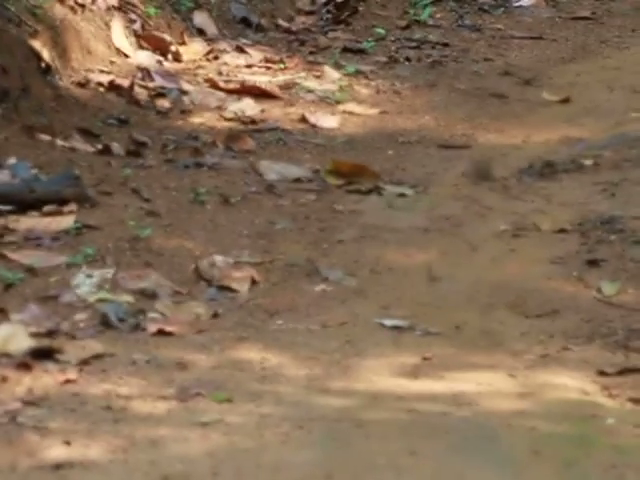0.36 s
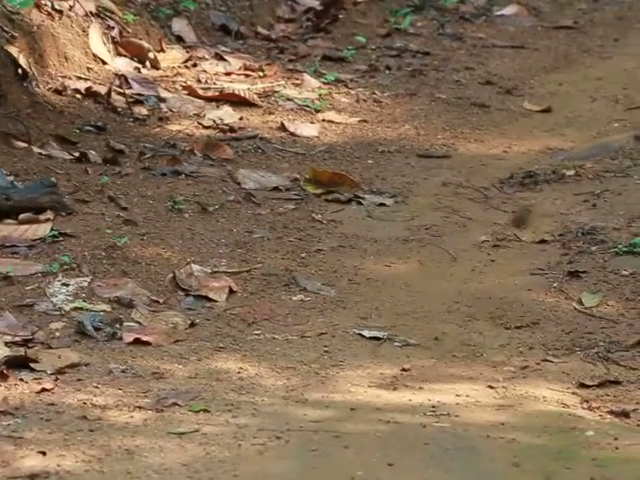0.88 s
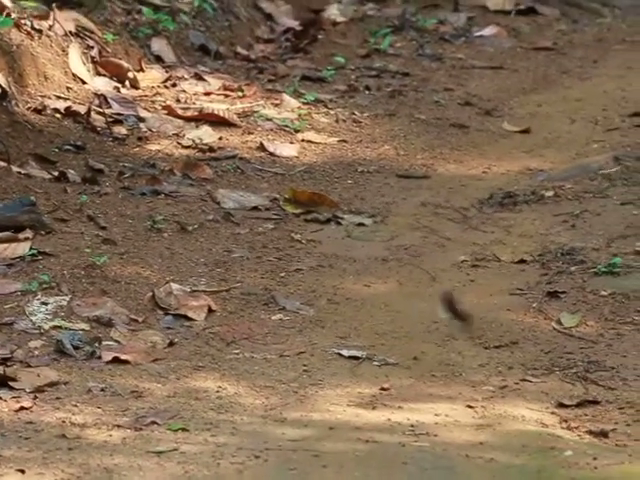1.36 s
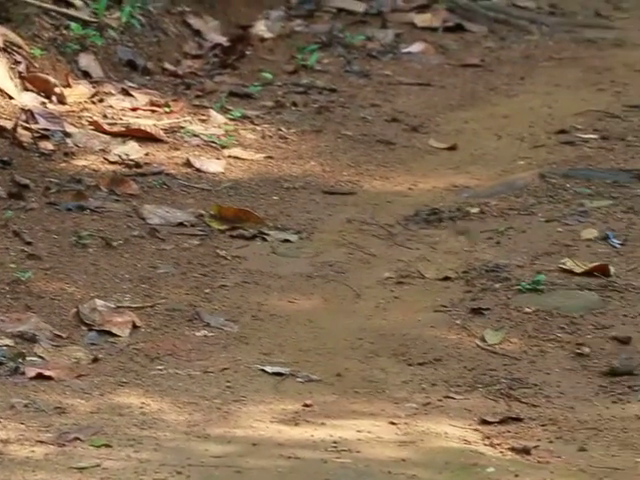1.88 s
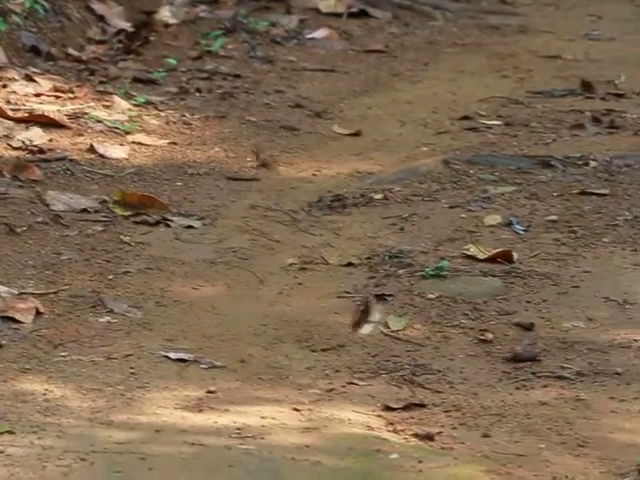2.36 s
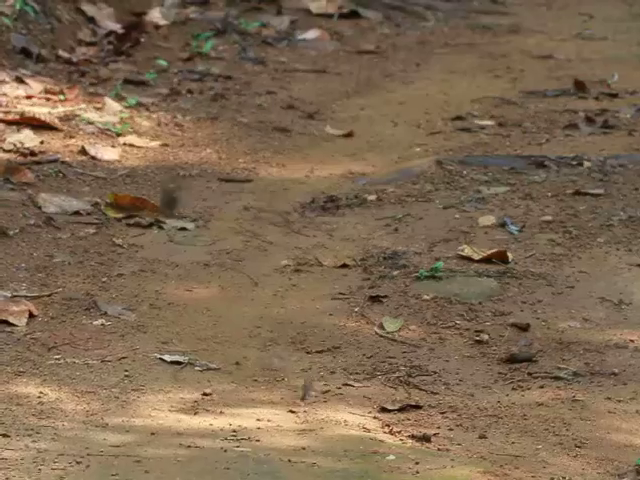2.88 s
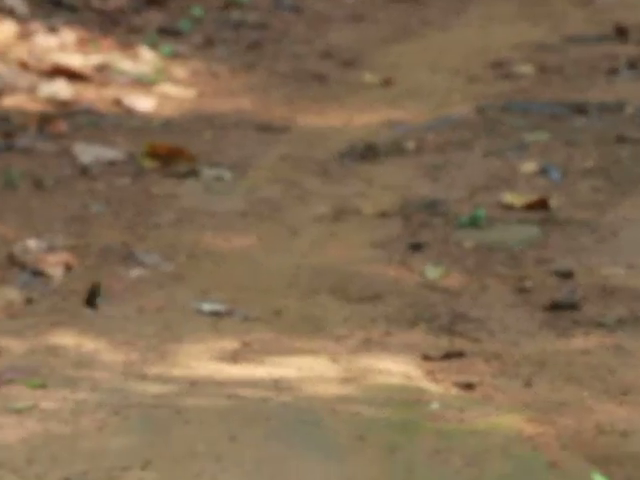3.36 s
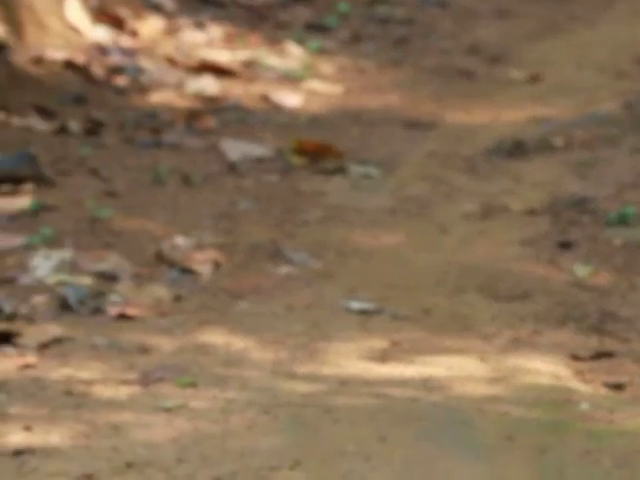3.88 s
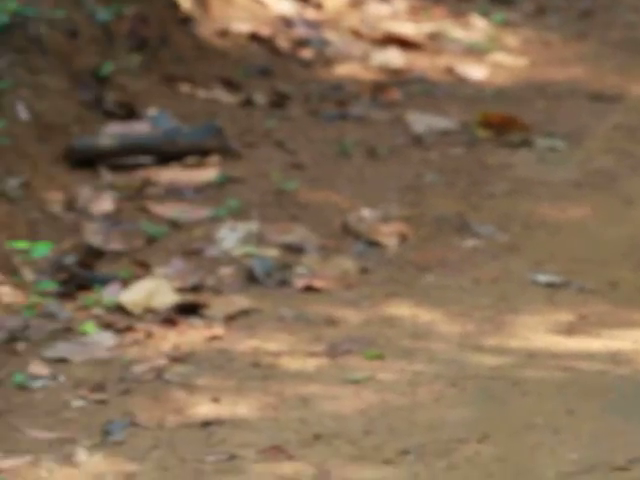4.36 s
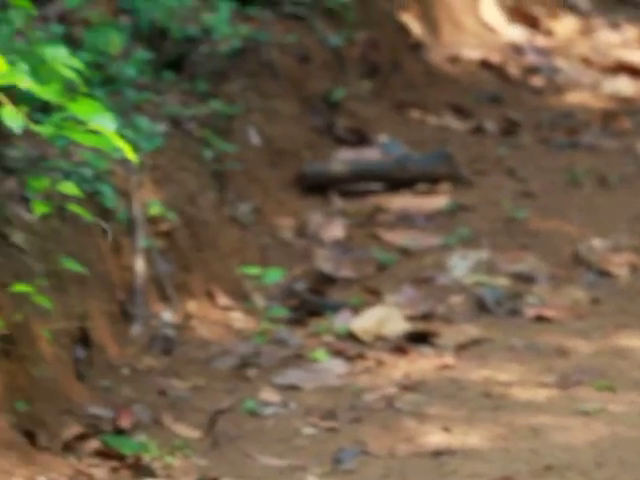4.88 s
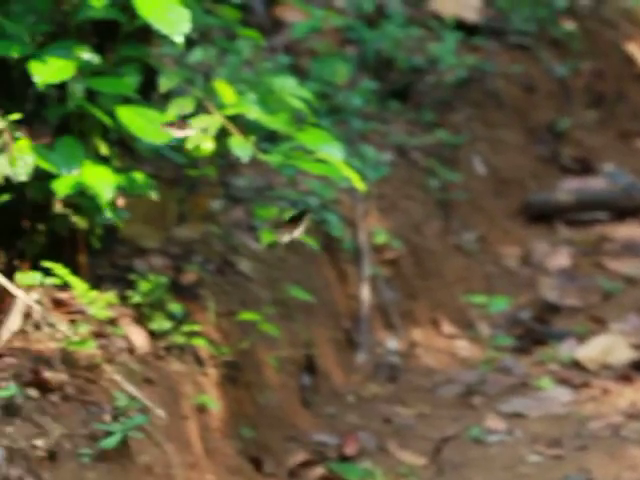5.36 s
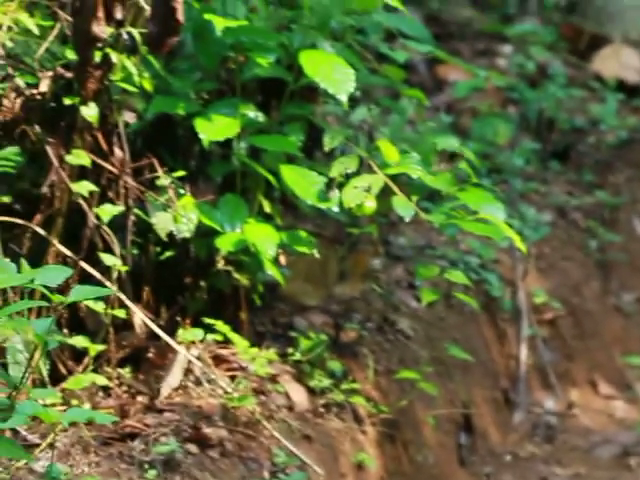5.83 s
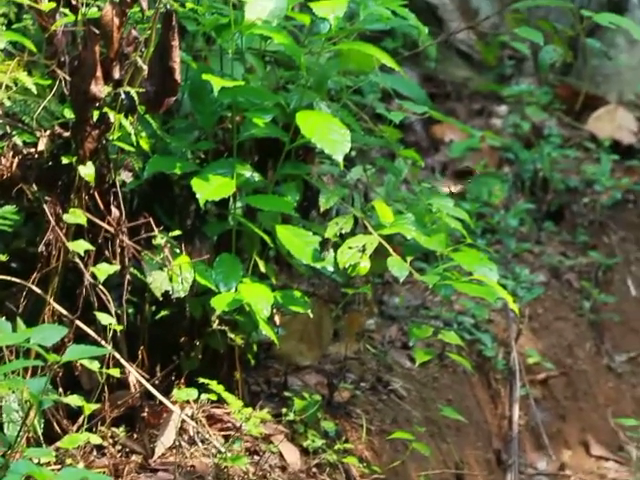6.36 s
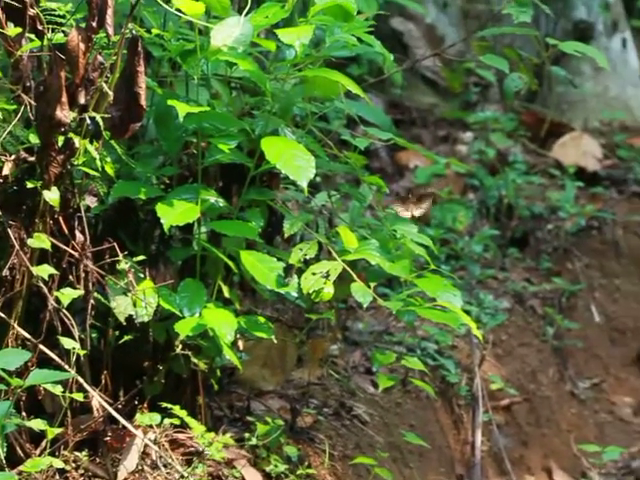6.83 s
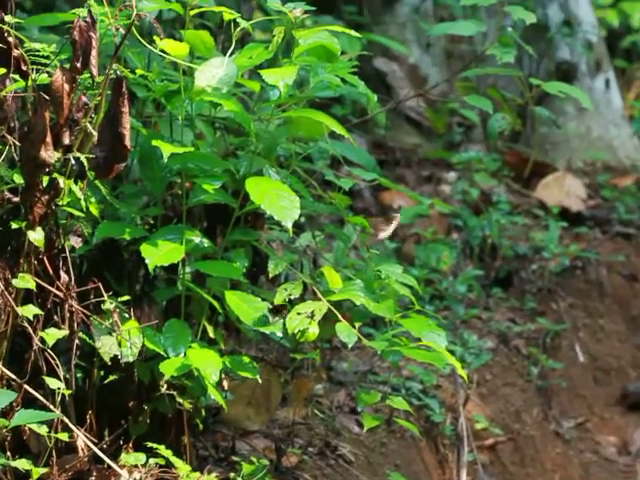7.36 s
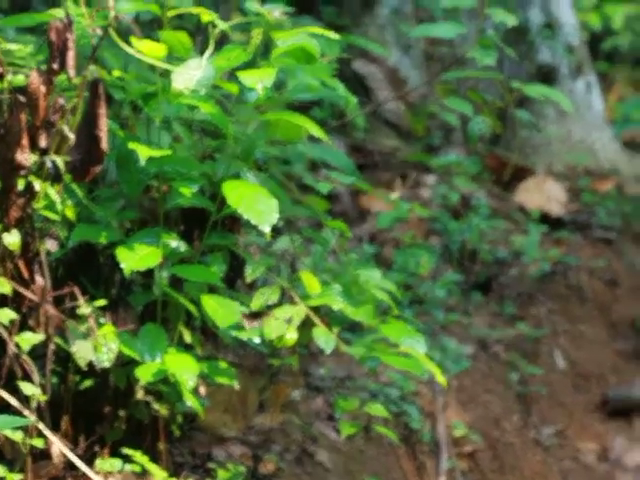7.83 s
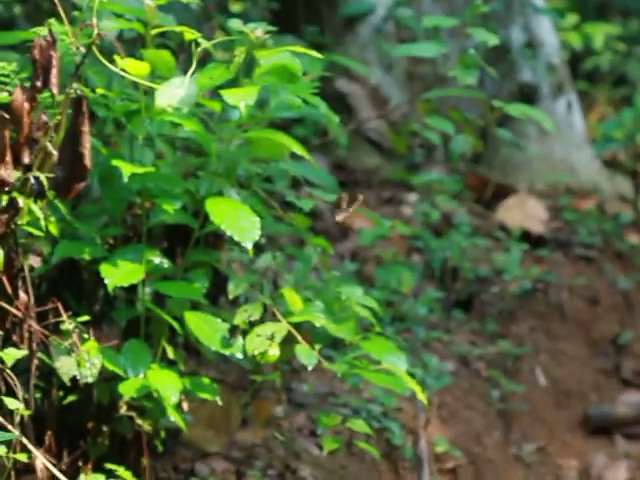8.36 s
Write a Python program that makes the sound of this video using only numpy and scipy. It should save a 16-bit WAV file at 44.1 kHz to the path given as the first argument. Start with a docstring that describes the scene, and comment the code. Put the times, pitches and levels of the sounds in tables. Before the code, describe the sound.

Many cicadas blend into one bright, buzzing high whine that swells slightly and then holds steady. A two-step insect call repeats about twice a second, and a clean, needle-like tone joins in bouts from the middle onward. Handling thumps dot the take, some clustered midway and near the end. Little rising chirps begin after the middle, softly echoed by trees, over a barely audible far engine and low air rumble.

```python
"""A crowd of cicadas drones over a forest path in the heat: many wavering tones that share one harmonic stack.
Two nearer insects sing thin lines in it; hiss and a throbbing buzz from filtered noise stand for far insects.
A small bird starts to chirp in quick upward glides, and far birds pipe faintly as short whistles.
Knocks ring the body of the hand-held recorder, and rustles are puffs of noise.
Underneath, a far engine built from sine waves revs once, over leaf murmur and rumble from shaped noise."""
import sys
import numpy as np
from scipy import signal
from scipy.fft import rfft, irfft
from scipy.io import wavfile

SR = 44100
rng = np.random.default_rng(int(sys.argv[2]) if len(sys.argv) > 2 else 0)


def ratio_of_db(decibels):
    """Turn decibels (scalar or array-like) into linear amplitude factors; 0 dB maps to 1."""
    return 10 ** (np.asarray(decibels, float) / 20)


def digitize_waveform(pressure):
    """Quantize a signal to 16-bit integers and store it at the path in sys.argv[1].

    Rows of a 2-D input are taken as channels; values are limited to [-1, 1].
    """
    field = np.atleast_2d(pressure).T
    bounded = np.clip(field, -1, 1)
    quanta = np.round(bounded * 32767).astype(np.int16)
    wavfile.write(sys.argv[1], SR, quanta)


N = 384552
T = np.arange(N) / SR


def rms_one(x):
    """Scale to an rms level (average strength) of 1."""
    return x / np.sqrt(np.mean(np.abs(x) ** 2) + 1e-20)


def in_time(rows):
    """Join the points of a table by lines and give each column after the time, sample by sample."""
    time_s, *columns = np.transpose(rows)
    return [np.interp(T, time_s, column) for column in columns]


def drift(knots_per_s):
    """Random wander of spread about 1: chance values joined by lines."""
    knots = rng.standard_normal(int(N / SR * 2000))
    return 1.22 * np.interp(T * knots_per_s, np.arange(len(knots)), knots)   # 1.22: the lines narrow the spread


def coloured(spectrum):
    """Noise whose strength at each pitch follows the given spectrum, rms 1."""
    hz, db = np.transpose(spectrum)
    bin_hz = np.arange(N // 2 + 1) * SR / N
    shape_db = np.interp(np.log(bin_hz + 1), np.log(hz), db, left=-90, right=-90)
    return rms_one(irfft(rfft(rng.standard_normal(N)) * ratio_of_db(shape_db), N))


def resonance(x, hz, width_hz):
    """A two-pole resonance: it favours sound near one pitch, with gain 1 on top."""
    r = np.exp(-np.pi * width_hz / SR)
    feed = np.array([1, 0, -1]) * (1 - r * r) / 2
    return signal.lfilter(feed, [1, -2 * r * np.cos(2 * np.pi * hz / SR), r * r], x)


def phasor(hz):
    """A turning unit arrow whose speed follows hz; its real part is a pure tone."""
    turns = np.cumsum(hz) / SR % 1
    return np.exp(2j * np.pi * turns).astype(np.complex64)


def tymbal(strokes_hz, depth):
    """Buckling strokes swell the tone some two hundred times a second, which sets side lines beside it."""
    uneven_hz = strokes_hz * (1 + .02 * drift(6) + rng.normal(0, .01))
    return 1 + depth * phasor(uneven_hz).real


def among_trees(x, echo_db, t60):
    """Scattered echoes from trunks and leaves blur a far sound; they fade by 60 dB in t60 seconds."""
    u = T[:SR // 2]
    tail = rng.standard_normal(len(u)) * ratio_of_db(-60 * u / t60) * (u > .008)
    echoes = signal.fftconvolve(x, tail / np.linalg.norm(tail))[:len(x)]
    return x + ratio_of_db(echo_db) * echoes


CROWD_HZ, BELOW_HZ, ABOVE_HZ = 2554.6, 66.0, 30.0   # commonest pitch, scale of the spread below and above it
WARM_UP_HZ, WARM_UP_S = 18, 1.7   # the crowd begins this flat; in tune by then
TYMBAL_HZ = 220   # strokes a second
# The crowd's other overtones, each favoured by a resonance.
# Columns: partial (multiple of the pitch), level_db (against the shrill fourth), width_hz (of the resonance)
PARTIALS = [(2, -22.0, 620), (3, -30.5, 900), (5, -22.5, 630), (6, -32.5, 900)]


def crowd(low_db, shrill_db, count=26):
    """Each cicada has its own pitch, waver and fading; all partials of one animal share its waver."""
    sums = np.zeros((6, N), np.complex64)
    spread = np.linspace(-1, 1, count)
    offsets = np.sign(spread) * -np.log(1 - np.abs(spread) * .93)   # crowded in the middle, thin outside
    flat_hz = WARM_UP_HZ * np.clip(2 - 2 * T / WARM_UP_S, 0, 1)
    together_hz = 7 * drift(5) - flat_hz   # they waver in step
    for offset in offsets:
        own_hz = offset * (ABOVE_HZ if offset > 0 else BELOW_HZ) + 8.0 * drift(2.5)
        tremor_hz = 22 * drift(300)   # fast, so it widens each line
        tone = phasor(CROWD_HZ + together_hz + own_hz + tremor_hz)
        partial = tymbal(TYMBAL_HZ, depth=0.63) * ratio_of_db(2.35 * drift(25) + 1.0 * drift(4))
        for k in range(6):
            # each multiplication by the tone climbs to its next multiple
            partial = partial * tone * np.exp(2j * np.pi * rng.random())
            sums[k] += partial
    first = sums[0].real
    # the belly rings on the first partial, most sharply at the commonest pitch
    belly = resonance(first, 2680, 750) + ratio_of_db(-5) * resonance(first, 2562, 55)
    upper = 0
    for multiple, level_db, width_hz in PARTIALS:
        ringing = resonance(sums[int(multiple) - 1].real, multiple * 2545, width_hz)
        upper = upper + ratio_of_db(level_db) * rms_one(ringing)
    shrill = resonance(resonance(sums[3].real, 9890, 690), 11720, 1800)   # a broad double resonance
    shrill = signal.sosfilt(signal.butter(4, 9650, "high", fs=SR, output="sos"), shrill)   # steep below it
    low_drone = ratio_of_db(low_db + .8 * drift(5)) * rms_one(belly)
    return low_drone + ratio_of_db(shrill_db + 0.08) * (rms_one(shrill) + upper)


BOUT_EDGE_S = 0.09   # time to swell in or out
# When the near cicada sings.
# Columns: start_s, length_s, first_hz, last_hz, level_db (before stroke and flutter)
BOUTS = [(3.42, .35, 10050, 10035, -31), (4.05, .32, 9995, 10110, -28), (4.37, .2, 10110, 10050, -28),
         (4.82, .35, 10020, 10017, -30), (5.35, 1.25, 10020, 10018, -30), (6.72, .6, 10040, 10050, -27),
         (7.33, .55, 10050, 10050, -25)]


def near_cicada():
    """A nearly clean line, sung in bouts that swell in and out, fluttering in level."""
    hz, gain = np.full(N, 10030.), np.zeros(N)
    for start, length, first_hz, last_hz, db in BOUTS:
        on = (T >= start) & (T < start + length)
        hz[on] = np.linspace(first_hz, last_hz, on.sum())
        to_edge_s = np.minimum(T[on] - start, start + length - T[on])
        gain[on] = ratio_of_db(db) * np.clip(to_edge_s / BOUT_EDGE_S, 0, 1)
    line = phasor(hz + 5 * drift(30)).real * tymbal(TYMBAL_HZ, depth=0.13)
    return np.sqrt(2) * line * gain * ratio_of_db(1.7 * drift(22) + 1.0 * drift(8.6))


PHRASE_S, HIGH_STEP_HZ, SINK_HZ = .41, 9252, 45   # phrase length, start of the high step, sinking in each step
LOW_STEP_FADES_DB_PER_S = .3   # later phrases have a fainter low step
# The two-step singer's phrases.
# Columns: start_s, level_db (of the high step, before flutter and echoes)
PHRASES = [(-.3, -42), (.138, -41), (.537, -40.5), (1.001, -42), (1.36, -41.5), (1.833, -41.5), (2.27, -41),
           (2.692, -40), (3.143, -42), (3.565, -41), (4.07, -41.5), (4.471, -43), (4.96, -44),
           (5.388, -42.5), (5.818, -43), (6.24, -41), (6.724, -39.5), (7.301, -42), (7.778, -45),
           (8.15, -47)]
# The pitch at which the low step begins, as it wanders through the scene.
# Columns: time_s, pitch_hz
LOW_STEP = [(0, 9090), (3, 9140), (6.2, 9165), (7.4, 9090), (7.9, 8990), (8.3, 9110)]


def two_step_singer():
    """Each phrase sinks along a high step, then a low one; the fourth partial is shrill, the first faint."""
    hz, gain = np.full(N, 9150.), np.zeros(N)
    low_hz, = in_time(LOW_STEP)
    for start, db in PHRASES:
        share = (T - start) / PHRASE_S   # how much of the phrase is over
        on = (share >= 0) & (share < 1)
        share = share[on]
        high = share < .5
        hz[on] = np.where(high, HIGH_STEP_HZ, low_hz[on]) - SINK_HZ * (2 * share % 1)
        swell = np.abs(np.sin(2 * np.pi * share)) ** 0.09   # dips between the steps
        gain[on] = swell * ratio_of_db(db + np.where(high, 0, -LOW_STEP_FADES_DB_PER_S * start))
    first = phasor((hz + 20.0 * drift(150)) / 4)
    shrill = (first ** 4).real * tymbal(250, depth=0.38)
    faint = ratio_of_db(-20.0) * (first * phasor(25.2 * drift(100))).real   # with an extra tremor
    song = np.sqrt(2) * (shrill + faint) * gain * ratio_of_db(2.1 * drift(35))
    return among_trees(song, echo_db=-6.0, t60=0.3)


THROBS_PER_S = 4.468
# Resonances that colour the throbbing buzz.
# Columns: pitch_hz, width_hz, gain_db (relative, at the top of the resonance)
BUZZ = [(3810, 160, -2.5), (6680, 510, -2), (7250, 170, -15), (8130, 490, 1.5), (10900, 520, -2.5)]
# Spectrum of the far insects' hiss.
# Columns: pitch_hz, level_db (relative, per Hz)
FAR = [(1500, -37), (2000, -14), (2300, -4.5), (3000, -5), (4200, -2), (5200, 0), (7250, -3.5),
       (8600, -5.5), (9100, 11.5), (9450, -2.5), (10500, 12), (10900, 8), (11200, 0), (11800, -4.5),
       (13300, -3.5), (14400, -13), (16000, -7), (17000, -4)]


def far_insects(db):
    """A smooth hiss of countless far insects, and a broad noise buzz that throbs four or five times a second."""
    throb = (1 + np.cos(2 * np.pi * THROBS_PER_S * T)) / 2
    buzz = 0
    for hz, width_hz, gain_db in BUZZ:
        buzz = buzz + ratio_of_db(gain_db) * resonance(rng.standard_normal(N), hz, width_hz)
    buzz = rms_one(buzz) * (0.78 + throb ** 0.6) * ratio_of_db(1.6 * drift(2.09))
    hiss = ratio_of_db(7.5 + .5 * drift(6.8)) * coloured(FAR)
    return ratio_of_db(db) * (hiss + ratio_of_db(-7.0) * buzz)


# When the small bird chirps.
# Columns: start_s, level_db (added to the chirp's shape), low_start_db (change to the low start)
CHIRPS = [(5.388, -48, -15), (5.702, -47, 0), (6.011, -47, 0), (6.306, -44, 0), (6.612, -44, 0),
          (6.909, -41.5, 0), (7.192, -42.5, -2), (7.492, -44.5, -2), (7.786, -42, -15), (8.066, -43, -3),
          (8.369, -42, 0), (8.697, -41, 0)]
# The shape of one chirp.
# Columns: after_start_s, pitch_hz, level_db (relative)
CHIRP = [(0, 2850, -5), (.008, 3250, 2), (.018, 3700, 6), (.025, 3950, 2), (.031, 4500, -2),
         (.04, 5050, -3), (.052, 5600, -14)]


def small_bird():
    """One upward glide is repeated, with slightly different pitch and loudness each time, and echoes added."""
    out = np.zeros(N + SR)
    after_s, chirp_hz, chirp_db = np.transpose(CHIRP)
    u = np.arange(int(after_s[-1] * SR)) / SR
    for start, db, low_start_db in CHIRPS:
        waver = (.012 + .5 * u) * drift(500)[:len(u)]   # grows along the chirp
        hz = np.interp(u, after_s, chirp_hz) * (1 + rng.normal(0, .004) + waver)
        high_end_db = rng.normal(0, 2.3)
        ends_db = np.interp(u, [.006, .013, .024, .03], [low_start_db, 0, 0, high_end_db])
        level_db = db + np.interp(u, after_s, chirp_db) + ends_db + 0.81 * drift(200)[:len(u)]
        out[int(start * SR):][:len(u)] += phasor(hz).real * ratio_of_db(level_db)
    return among_trees(out, echo_db=-5.5, t60=0.6)


HOOT_S, HOOT_HZ, HOOT_DB = .062, 812, -61.5   # length, first pitch, level before waver and echoes
# Even runs of hoots by a far bird.
# Columns: first_s, last_s, hoots (count)
HOOT_RUNS = [(1.42, 2.81, 4), (5.93, 8.6, 7)]
# Piping of far birds.
# Columns: start_s, length_s, first_hz, last_hz, level_db (before waver and echoes)
NOTES = [(1.0, 0.3, 2200, 2180, -57.5), (1.43, 0.044, 2850, 2890, -49), (1.725, .073, 2060, 2000, -51),
         (1.787, 0.11, 2050, 1990, -59), (2.76, .3, 2160, 2180, -65), (4.27, .28, 2150, 2180, -71),
         (4.79, .37, 862, 863, -59.5), (5.95, .18, 2180, 2190, -62), (7.55, .17, 2195, 2200, -57)]


def far_birds():
    """Piping and hoots are short pure whistles with soft edges and a slight waver."""
    out = np.zeros(N + SR)
    hoots = [(start, HOOT_S, HOOT_HZ, HOOT_HZ + 6, HOOT_DB)
             for run in HOOT_RUNS for start in np.linspace(*run)]
    for start, length, first_hz, last_hz, db in NOTES + hoots:
        n = int(length * SR)
        hz = np.linspace(first_hz, last_hz, n) * (1 + .007 * drift(90)[:n])
        whistle = phasor(hz).real * signal.windows.tukey(n, .6)
        out[int(start * SR):][:n] += np.sqrt(2) * ratio_of_db(db + 1.5 * drift(40)[:n]) * whistle
    return out


def birds():
    """The small bird and the far birds share one more layer of echoes."""
    return among_trees((small_bird() + far_birds())[:N], echo_db=-13, t60=.3)


# Knocks on the recorder.
# Columns: start_s, peak_db, centre_hz, reach_octaves
KNOCKS = [(.114, -39, 500, 0.91), (1.005, -39, 205, 0.68), (1.019, -41, 403, 0.65), (1.055, -43, 300, .8),
          (3.18, -42, 850, 0.47), (3.431, -31.5, 480, 1.0), (3.715, -32.5, 520, 0.57),
          (3.724, -32, 400, 1.6), (3.915, -28.5, 900, 0.3), (5.547, -35, 600, 0.89), (5.85, -42, 740, .6),
          (6.603, -45, 343, 0.45), (6.889, -45, 635, .7), (7.982, -45, 1300, 0.37), (7.993, -29, 700, 1.1),
          (7.996, -30, 350, 1.4), (8.031, -33, 563, 0.49), (8.041, -44, 400, 0.54)]
# Modes of the recorder's body, the pitches at which it rings.
# Columns: pitch_hz, level_db (relative), t60_s (time to fade by 60 dB)
BODY = [(205, -4, 0.041), (338, 2.5, 0.03), (466, 1.5, 0.022), (600, 1.5, 0.02), (773, -0.5, 0.024),
        (970, 0.5, 0.012), (1200, 1, 0.021), (1390, 0, 0.015)]
# Rustles of the grip.
# Columns: start_s, length_s, low_hz, high_hz, level_db (before the soft edges)
RUSTLES = [(0, 0.36, 250, 860, -53.5), (.2, 0.33, 537, 1290, -55), (0.189, 0.31, 700, 850, -56.5),
           (0.991, .12, 150, 3000, -49.5), (3.101, 0.21, 546, 1100, -57.5), (4.099, 0.39, 220, 600, -56.5),
           (6.5, 0.4, 248, 800, -61.5)]


def handling():
    """A knock rings the modes near its centre, the low ones swelling later; a rustle is a grainy puff of noise."""
    out, u = np.zeros(N), T[:SR // 8]
    for start, db, centre_hz, reach in KNOCKS:
        ring = 0
        for hz, mode_db, t60 in BODY:
            away = np.log2(hz / centre_hz) / reach
            strength = ratio_of_db(mode_db - 7.0 * away ** 2 + rng.normal(0, 1))
            swell = 1 - np.exp(-u * hz * 1.2)
            tone = np.sin(2 * np.pi * (hz * u + 0.2 * rng.random()))
            ring = ring + strength * swell * ratio_of_db(-60 * u / t60) * tone
        out[int(start * SR):][:len(u)] += ratio_of_db(db) * ring / np.abs(ring).max()
    for start, length, low_hz, high_hz, db in RUSTLES:
        n = int(length * SR)
        band = signal.butter(2, [low_hz, high_hz], "band", fs=SR, output="sos")
        grains = rng.standard_normal(n) * ratio_of_db(3 * drift(120)[:n])
        puff = rms_one(signal.sosfilt(band, grains))
        out[int(start * SR):][:n] += ratio_of_db(db) * puff * signal.windows.tukey(n, .6)
    return out


PULL_START_S, PULL_END_S, EASE_S = 1.3, 4.0, .3   # it pulls between these; time to change over
IDLE_PER_S, LOUDER_DB = 14, .8   # firings a second at idle; dB gained for each firing a second above it
# The engine idles, revs up and falls back.
# Columns: time_s, firings_per_s
ENGINE = [(0, 13.2), (1.15, 13.45), (1.5, 14.5), (2.16, 16.5), (2.82, 18.4), (3.47, 20.4), (3.95, 21.3),
          (4.45, 19.9), (4.9, 19.6), (5.43, 17.3), (6.08, 15.9), (6.73, 14.2), (7.1, 13.9), (8.72, 14.2)]
# Strength of the multiples of the firing rate, at idle speed and before distance and fading.
# Columns: multiple, pulling_db, running_free_db
ENGINE_ORDERS = [(2, -68, -69), (3, -80, -71), (4, -68, -76), (5, -68, -70), (6, -71, -70), (7, -71, -78),
                 (8, -71, -71), (9, -77, -78)]
# How well each pitch carries this far.
# Columns: pitch_hz, gain_db
DISTANCE = [(25, -22), (33, -9), (42, 0), (105, 0), (130, -3), (165, -16), (200, -25)]


def far_engine():
    """Only low multiples of the firing rate carry this far, each fading on its own along the way."""
    rate_hz, = in_time(ENGINE)
    pull = np.clip(np.minimum(T - PULL_START_S, PULL_END_S - T) / EASE_S + .5, 0, 1)
    phase = 2 * np.pi * np.cumsum(rate_hz * (1 + .003 * drift(4))) / SR
    out = 0
    for multiple, pull_db, free_db in ENGINE_ORDERS:
        multiple = round(multiple)
        speed_db = LOUDER_DB * (rate_hz - IDLE_PER_S)
        load_db = pull * pull_db + (1 - pull) * free_db
        carried_db = np.interp(multiple * rate_hz, *np.transpose(DISTANCE))
        gain = ratio_of_db(speed_db + load_db + carried_db + 3.3 * drift(2.49))
        out = out + np.sqrt(2) * gain * np.sin(multiple * phase + rng.uniform(0, 2 * np.pi))
    return out


LEAVES_DB, RUMBLE_DB = -55, -64.5   # levels around which each wanders
# Spectrum of the leaves.
# Columns: pitch_hz, level_db (relative, per Hz)
RUSTLE = [(76, -28), (130, -2), (173, -6), (280, -1), (962, -6.5), (1240, -5.5), (1520, -9.5), (2000, -8),
          (2600, -45), (4400, -120)]
# Spectrum of the low rumble.
# Columns: pitch_hz, level_db (relative, per Hz)
RUMBLE = [(15, -30), (28, -13), (42, -0.5), (58, -7.5), (80, 3), (100, 8), (125, -3), (160, -8.5),
          (250, -23)]


def air():
    """A steady murmur of leaves over a low rumble, both noise of gently wandering level."""
    leaves = ratio_of_db(LEAVES_DB + .7 * drift(3) + .8 * drift(12)) * coloured(RUSTLE)
    return leaves + ratio_of_db(RUMBLE_DB + 1.2 * drift(1.6)) * coloured(RUMBLE)


LOW_DB, LOW_FOLLOWS = -40, 0.88   # low drone: base level at mean effort, share of the effort's swing
FAR_DB, FAR_FOLLOWS = -42.5, 0.69   # far insects: the same two settings
TURN_S, TURN_LASTS_S, TURN_LOSS_DB = 5.1, .7, 1   # the microphone turns away from the low drone
# How hard the chorus sings.
# Columns: time_s, level_db (base level of the shrill drone)
EFFORT = [(0, -26.5), (.6, -26), (2, -24.5), (3.3, -24.5), (4.1, -23.5), (5, -23.7), (6.3, -24), (7.5, -24),
          (8, -24), (8.72, -24)]


def scene():
    """All sources, heard by one microphone; low drone and far insects follow the chorus's effort."""
    shrill_db, = in_time(EFFORT)
    swing_db = shrill_db - shrill_db.mean()
    turn_db = TURN_LOSS_DB * np.clip((T - TURN_S) / TURN_LASTS_S, 0, 1)
    low_db = LOW_DB + LOW_FOLLOWS * swing_db - turn_db
    insects = crowd(low_db, shrill_db) + near_cicada() + two_step_singer()
    insects = insects + far_insects(FAR_DB + FAR_FOLLOWS * swing_db)
    return (insects + birds() + handling() + far_engine() + air())[None]


def band_limit(x):
    """A steep low-pass at the top of the band."""
    return signal.sosfilt(signal.butter(12, 17030, fs=SR, output="sos"), x)


def record(dry):
    """A steep low-pass filter cuts the top of the finished mix."""
    low_pass = signal.ellip(12, .5, 70, 15730, fs=SR, output="sos")   # ripple dB, depth dB, cutoff Hz
    mix = signal.sosfilt(low_pass, dry)
    return band_limit(mix)


dry = scene()
out = record(dry)
digitize_waveform(out)
```